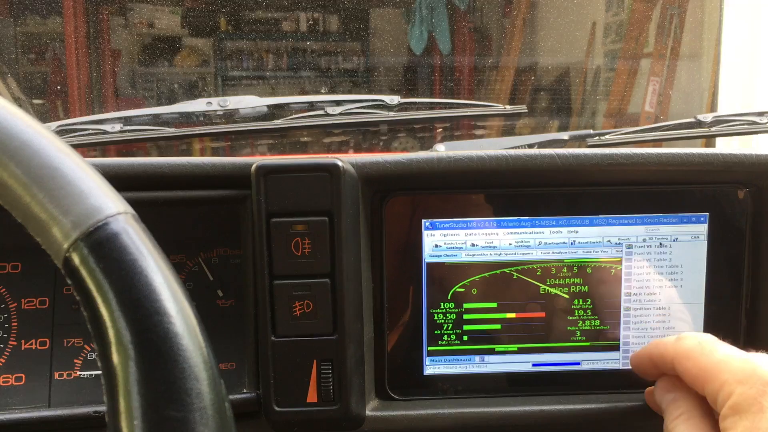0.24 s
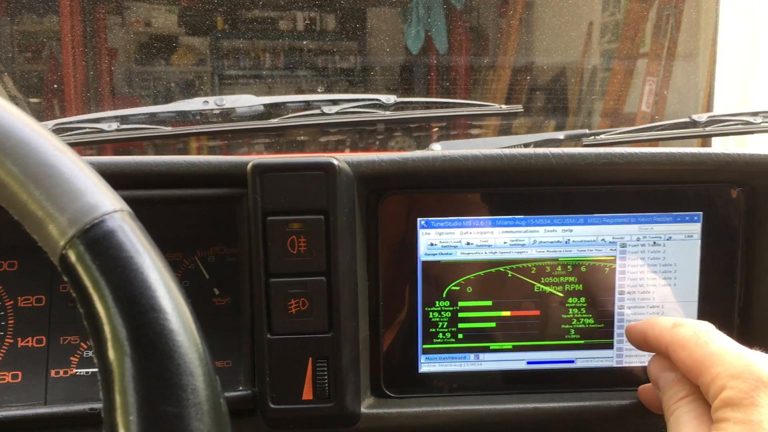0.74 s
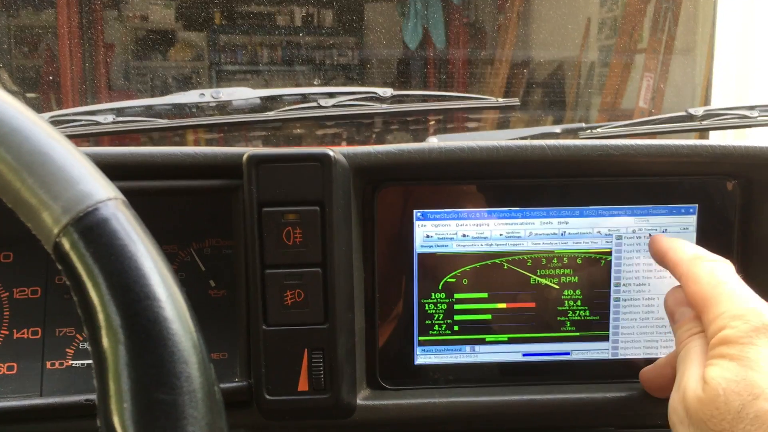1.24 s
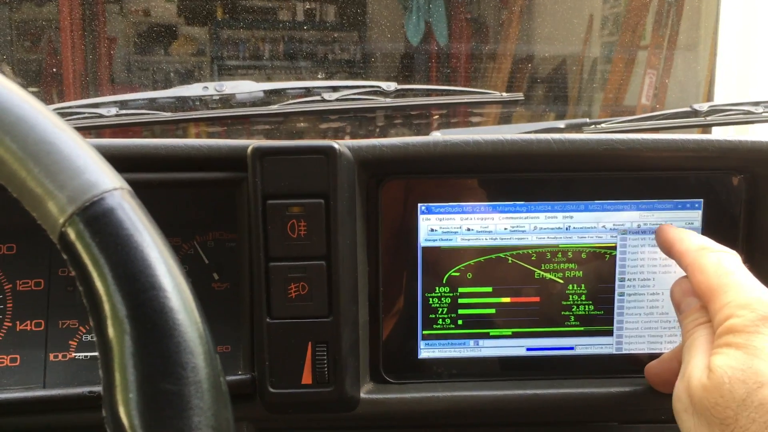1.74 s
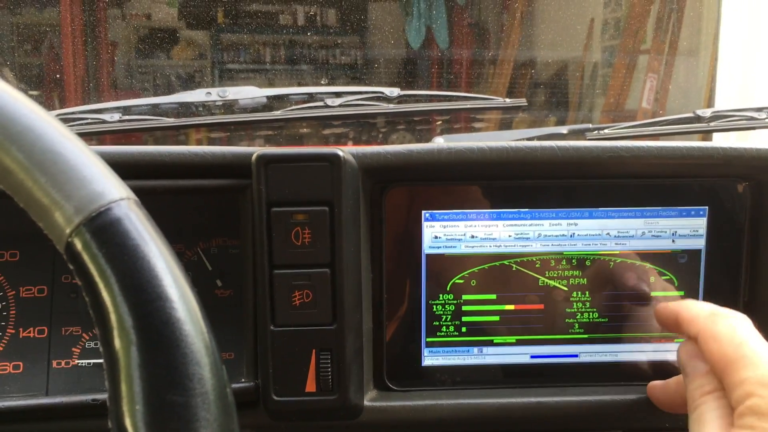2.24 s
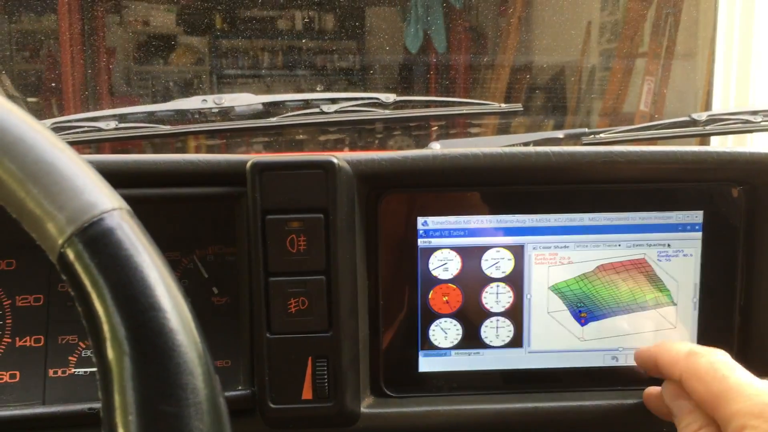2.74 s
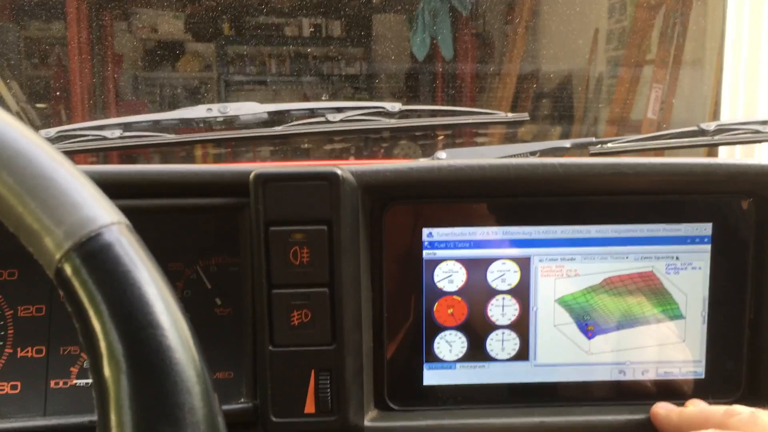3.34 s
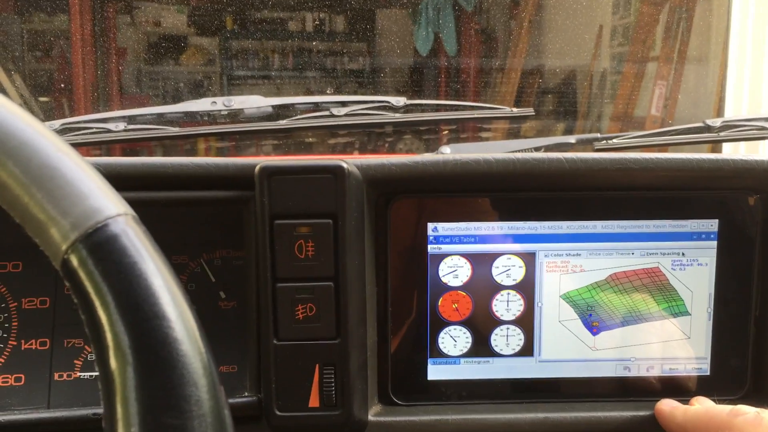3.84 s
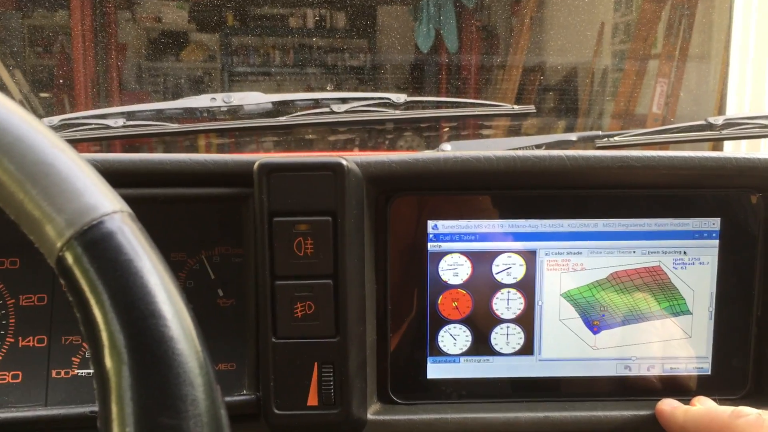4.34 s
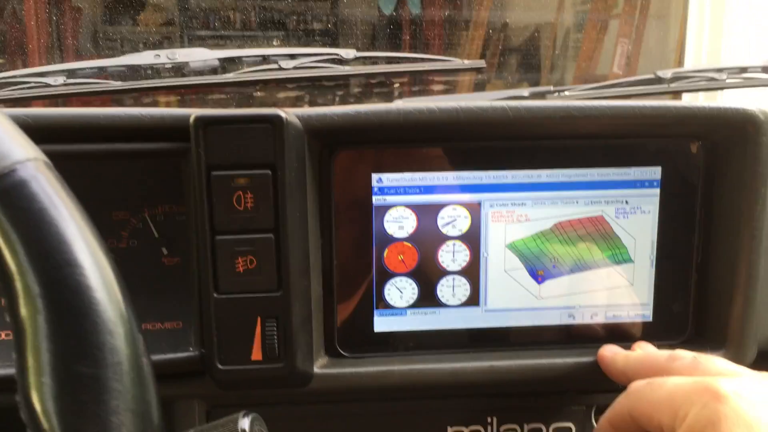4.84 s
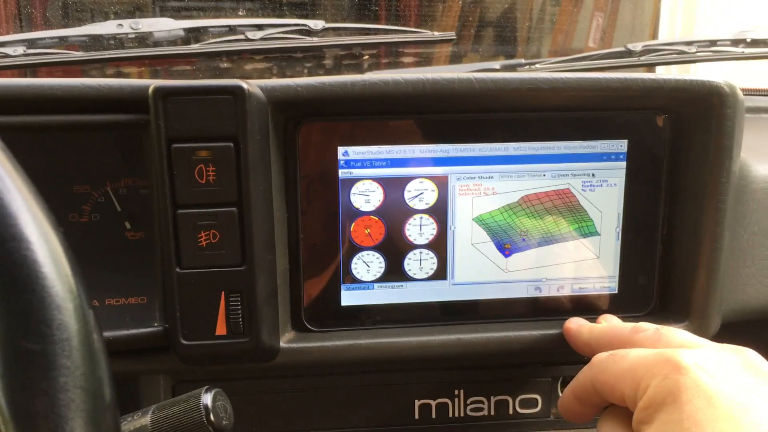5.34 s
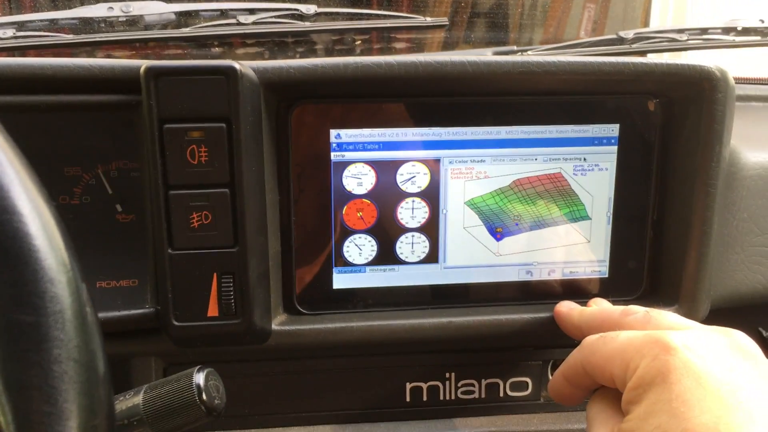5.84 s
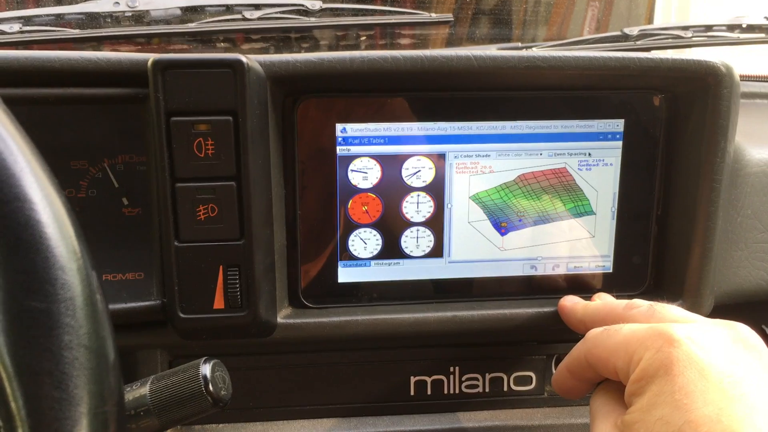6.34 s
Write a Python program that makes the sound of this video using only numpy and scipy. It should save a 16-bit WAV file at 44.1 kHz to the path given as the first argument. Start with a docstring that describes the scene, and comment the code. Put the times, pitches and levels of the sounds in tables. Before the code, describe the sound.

Heard from the driver's seat inside a stationary car, a six-cylinder petrol engine idles for the first 3.5 seconds. A heavy boom near 52 to 54 Hz fills the cabin, with slightly uneven exhaust throbs, low rumble, dull thuds, muffled valve clatter and tiny injector ticks. A thin, fluttering pulley whine sits around 1.4 kHz. At about 1.2 s a finger gives a small dry tap on the dashboard screen, with very faint skin swishes just before it and near 2.9 and 3.2 s. The idle sags slightly at 3.5 s, then the revs climb, fast until about 4.4 s and more gently to a peak near 5.6 s, at roughly twice idle speed. The growl smooths and rises, with bark and fan rush growing. From 5.8 s it sinks gradually, still well above idle at the 6.6 s end. Faint steady microphone hiss remains beneath.

```python
"""Driver's seat of a car, with a V6 petrol engine beyond the bulkhead: it idles, is slowly revved to
twice its speed and starts to sink back. The cabin booms near 54 Hz, driven by the firings at idle and
by the crankshaft at twice the speed. Exhaust orders, harmonics of the engine cycle, bark.
Noise and clicks timed by the crank make rumble, thuds, clatter and ticks; a pulley whines, the fan rush grows.
On the dashboard a finger brushes and taps a screen; faint microphone hiss lies beneath."""
import sys
import numpy as np
from scipy import signal
from scipy.fft import rfft, irfft, next_fast_len
from scipy.io import wavfile

SR = 44100
rng = np.random.default_rng(int(sys.argv[2]) if len(sys.argv) > 2 else 0)


def store_wav(level_fs):
    """Save 16-bit WAV to argv[1]."""
    pcm = np.round(np.clip(np.atleast_2d(level_fs), -1, 1) * 32767)
    wavfile.write(sys.argv[1], SR, pcm.T.astype(np.int16))


N = 290178
TIME = np.arange(N) / SR


def from_db(db):
    """Decibels to gain."""
    return 10 ** (np.asarray(db) / 20)


def rms_one(x):
    """Scale to unit rms."""
    return x / np.sqrt(np.mean(x ** 2) + 1e-20)


def at_hz(points, hz):
    """Read a spectrum in dB on a log-frequency axis."""
    f, db = np.transpose(points)
    return np.interp(np.log(hz + 1e-6), np.log(f), db)


def colour(x, spectrum, peaks=()):
    """Give x a broad spectrum with resonant peaks; rms 1."""
    size = next_fast_len(N + SR)
    hz = np.arange(size // 2 + 1) * SR / size
    db = at_hz(spectrum, hz)
    for peak_hz, width_hz, peak_db in peaks:
        db = db + peak_db / (1 + (2 * (hz - peak_hz) / width_hz) ** 2)
    return rms_one(irfft(rfft(x, size) * from_db(db), size)[:N])


def noise():
    """White noise for the full length."""
    return rng.standard_normal(N)


def drift(rate):
    """Smooth chance of spread 1, with about `rate` new values a second."""
    knots = rng.standard_normal(2000)
    return rms_one(np.interp(TIME * rate, np.arange(len(knots)), knots))


def butter(x, order, hz, kind="low"):
    """Smooth low-pass or high-pass."""
    return signal.sosfilt(signal.butter(order, hz, kind, fs=SR, output="sos"), x)


# Engine speed as it idles, revs and sinks back. Each row: time in seconds, firings per second.
SPEED = [(0.0, 51.8), (0.97, 52.29), (1.46, 51.16), (2.88, 52.79), (3.52, 50.35), (3.68, 52.8),
         (3.85, 62.25), (4.06, 72.04), (4.24, 86.59), (4.4, 93.97), (4.6, 99.72), (4.96, 106.19),
         (5.25, 109.4), (5.57, 112.4), (5.8, 111.74), (6.0, 108.4), (6.26, 103.99), (6.58, 97.6)]
IDLE_HZ, TOP_HZ = 52, 112   # firings per second


def engine_speed():
    """Firings per second at every sample, and revs on a log scale: 0 idling, 1 revved."""
    seconds, rate = np.transpose(SPEED)
    firings = np.interp(TIME, seconds, rate)
    return firings, np.log(firings / IDLE_HZ) / np.log(TOP_HZ / IDLE_HZ)


# Gaining speed at the first rate takes full load; losing it at the second is full overrun.
FULL_LOAD_HZ_PER_S, OVERRUN_HZ_PER_S, LOAD_LAG_S = 65, 12, 0.032


def speed_change(firings, full_hz_per_s):
    """How fast the engine gains speed (or loses it, for a negative rate), 0 to 1, felt with a lag."""
    share = np.clip(np.gradient(firings) * SR / full_hz_per_s, 0, 1)
    keep = np.exp(-1 / (LOAD_LAG_S * SR))
    return signal.lfilter([1 - keep], [1, -keep], share)


def resonate(x, hz, width_hz):
    """A driven mode: gain 1 and a quarter turn late at its own pitch."""
    r, w = np.exp(-np.pi * width_hz / SR), 2 * np.pi * hz / SR
    return signal.lfilter([0, (1 - r * r) * np.sin(w)], [1, -2 * r * np.cos(w), r * r], x)


# The two forces that shake the cabin. Each: level at idle in dB, rise when revved in dB,
# change under load in dB.
FIRING_FORCE = (-31.5, -0.96, 9.8)
CRANK_FORCE = (-43.5, 22.1, -9)
# Lowest air modes of the cabin around the seat. Each row: pitch in Hz, width in Hz, signed gain as a factor.
BOOM_MODES = [(53.25, 4.22, -11), (53.67, 8.15, 7.5), (66.6, 11.65, -3), (78.7, 2.8, 0.5)]


def boom(cycle, revs, load):
    """Six firings and three slower crank shakes per cycle drive the cabin, whose air modes swell and ring on."""
    fire_angle, crank_angle, waver_db = -.007, .074, .6   # angles in cycles
    run_in = cycle[0] + (cycle[1] - cycle[0]) * np.arange(-SR, 0)   # one second of idling beforehand
    angle = np.concatenate([run_in, cycle])

    def strength(force):
        """Gain of a force, held steady through the run-in."""
        idle_db, rise_db, load_db = force
        return np.pad(from_db(idle_db + rise_db * revs + load_db * load), (SR, 0), "edge")

    firing = strength(FIRING_FORCE) * np.cos(2 * np.pi * 6 * (angle - fire_angle))
    crank = strength(CRANK_FORCE) * np.cos(2 * np.pi * 3 * (angle - crank_angle))
    force = firing + crank
    modes = sum(gain * resonate(force, hz, width_hz) for hz, width_hz, gain in BOOM_MODES)
    return np.sqrt(2) * (force + modes)[SR:] * from_db(waver_db * drift(30))


# Orders that stand out, low throb first, then exhaust bark and growl, before the cabin colours them.
# Each row: multiple of the cycle rate, level at idle in dB, level revved in dB, change under load in dB.
STRONG_ORDERS = [(2,-65.5,-24,10.5), (4,-33.5,-31,-0.5), (5,-45.5,-46,12), (7,-65.5,-46,5.5),
                 (8,-50,-40,-6), (9,-41.5,-50,2), (10,-48,-53,2), (12,-37.5,-32,-1), (13,-45,-53,-5),
                 (14,-48,-48,-1.5), (15,-58,-55.5,-1.5), (16,-49.5,-49,-3.5), (18,-48.5,-39,4),
                 (19,-54.5,-55.5,1), (20,-50,-43,-7.5), (22,-57.5,-48,-7), (23,-70,-42,0.5),
                 (25,-65,-53.5,6), (26,-51.5,-54,-5), (27,-63,-58.5,-6.5), (30,-50,-54.5,1),
                 (34,-56,-57.5,-7), (35,-59.5,-60.5,-9.5), (36,-64,-59,-1.5), (39,-64,-55,-4),
                 (40,-51.5,-62,-7), (42,-66,-56.5,10.5), (48,-57.5,-50.5,-8.5), (51,-66,-61,0),
                 (54,-67.5,-59.5,-6), (55,-70,-61,-2), (60,-64.5,-66.5,4.5)]
# The other orders: level of an odd one, steps up for even ones and again for firing multiples.
ORDER_IDLE_DB, ORDER_REVVED_DB, EVEN_DB, FIRING_DB = -56, -59, 5, 17
# Above the knee those other orders fall away.
KNEE_ORDER, IDLE_FALL_DB_PER_OCTAVE, REVVED_FALL_DB_PER_OCTAVE = 9.14, 9.5, 7


def order_levels(k):
    """Level of order k at idle and revved, and its change under load, in dB."""
    for multiple, *levels_db in STRONG_ORDERS:
        if multiple == k:
            return levels_db
    family_db = EVEN_DB * (k % 2 == 0) + FIRING_DB * (k % 6 == 0)
    octaves = max(np.log2(k / KNEE_ORDER), 0)
    return (ORDER_IDLE_DB + family_db - IDLE_FALL_DB_PER_OCTAVE * octaves,
            ORDER_REVVED_DB + family_db - REVVED_FALL_DB_PER_OCTAVE * octaves, 0)


# How the cabin passes the engine orders to the seat. Each row: frequency in Hz, gain in dB.
CABIN = [(18.0, 2.2), (34.0, -4), (44.0, -4.5), (54.0, 10), (61.0, 11), (70.0, 10), (78.0, 4.2),
         (92.0, 0.5), (135.0, 8), (170.0, -3), (205.0, -5.5), (238.0, -10), (290.0, 2.2), (340.0, -6),
         (425.0, 0.6), (480.0, -11.5), (530.0, -0.5), (575.0, -9.5), (640.0, 2), (760.0, -15.5),
         (900.0, -7.3), (1020.0, -4), (1150.0, -1)]


def exhaust(cycle, revs, load, chuff_db):
    """The cylinders fire unevenly: harmonics of the whole cycle sweep through the cabin's resonances."""
    cycle_hz = np.gradient(cycle) * SR
    throb_angle, chuff_angle, second_angle = .63, .19, .57   # in cycles
    second_chuff_db, waver_db, wander_rad = -3, 1.5, .015
    out = np.zeros(N)
    for k in [2, 4, 5, *range(7, 62)]:
        idle_db, revved_db, load_db = order_levels(k)
        level_db = idle_db + (revved_db - idle_db) * revs + load_db * load
        level_db = level_db + at_hz(CABIN, k * cycle_hz)
        if k < 6:
            # one throb per cycle, lagging as these orders rise past the air modes
            lag = np.interp(k * cycle_hz, [45, 70], [0, .75])
            turns = k * (cycle - throb_angle) - lag
        elif k < 18:
            # a strong and a weak chuff per cycle, both dips in pressure
            strong = np.exp(-2j * np.pi * k * chuff_angle)
            weak = from_db(second_chuff_db) * np.exp(-2j * np.pi * k * second_angle)
            turns = k * cycle + np.angle(-(strong + weak)) / (2 * np.pi)
            level_db = level_db + chuff_db
        else:
            # the firing multiples bark in step, and the pipe scatters the rest
            turns = k * cycle + (k % 6 > 0) * (rng.random() + .1 * drift(3))
        # timing wanders most at idle, which blurs the high orders
        wander = wander_rad * k * (1 - .7 * revs) * drift(14)
        out += from_db(level_db + waver_db * drift(6.5)) * np.cos(2 * np.pi * turns + wander)
    return np.sqrt(2) * out


# Colour of the combustion rumble. Each row: frequency in Hz, level in dB per Hz.
RUMBLE = [(12, -20.5), (26, -2.5), (45, 2.5), (75, 5), (115, 0), (150, -0.5), (190, -14.5), (240, -17),
          (300, -17), (430, -21), (500, -42), (900, -48)]


def rumble(cycle, revs):
    """Uneven combustion rumbles between the low orders, in one lump per cycle, deepest at idle."""
    idle_db, rise_db = -36.5, 4
    lope_db = 3 * (1 - .6 * revs) * np.cos(2 * np.pi * (cycle - .35))
    return from_db(idle_db + rise_db * revs + lope_db) * butter(colour(noise(), RUMBLE), 4, 1000)


# Strength of the six cylinders in firing order. Each entry: level in dB.
CYLINDERS_DB = [-1.5, -2.5, 0, 0.5, -4, -1.5]
# Colour of a firing's thud. Each row: frequency in Hz, level in dB per Hz.
THUD = [(120, -14), (200, -4), (290, 1), (410, -2), (470, -13), (640, -12.5), (780, -19), (1500, -30),
        (4000, -60)]
# Resonances of the engine block. Each row: frequency in Hz, width in Hz, height in dB.
BLOCK = [(295, 40, 3), (420, 35, 4), (527, 45, 6), (625, 55, 4)]


def thuds(cycle, revs, level_db=-48.0, rise_db=3, fade_share=0.62, scatter_db=2):
    """Every firing thuds into the block as fading noise, with its cylinder's strength and some scatter."""
    firing, since = np.divmod(6 * cycle + .25, 1)   # count of firings, and share of the gap gone by
    firing = firing.astype(int)
    scatter = scatter_db * rng.standard_normal(firing.max() + 1)
    strength_db = np.take(CYLINDERS_DB, firing, mode="wrap") + scatter[firing]
    bursts = from_db(strength_db) * np.exp(-since / fade_share) * noise()
    return from_db(level_db + rise_db * revs) * colour(bursts, THUD, BLOCK)


def contacts(cycle, spread_db, scatter_db, jitter_s, count):
    """Clicks near the same crank angles in every cycle, each contact with its own strength."""
    angles = (np.arange(count) + rng.random(count)) / count
    strength = rng.choice([-1, 1], count) * from_db(spread_db * rng.standard_normal(count))
    when = np.interp(np.arange(100)[:, None] + angles, cycle, TIME, right=-1)   # up to 100 cycles
    at = ((when + jitter_s * rng.standard_normal(when.shape)) * SR).astype(int)
    sizes = strength * from_db(scatter_db * rng.standard_normal(when.shape))
    heard = (at > 0) & (at < N)
    return np.bincount(at[heard], sizes[heard], N)


def rattle_noise(clicks, fade):
    """Noise that bursts at each click and dies away with the fade."""
    power = np.abs(signal.fftconvolve(clicks ** 2, fade ** 2)[:N])
    return np.sqrt(power) * noise()


# Colour of the valve train from the seat. Each row: frequency in Hz, level in dB per Hz.
CLATTER = [(150, -41), (300, -7), (620, -2.5), (750, -1.5), (930, 1), (1200, -.5), (1570, -10), (1900, -7),
           (2700, -11), (3000, -17.5), (4200, -20), (7300, -28), (9000, -27.5), (10400, -33.5),
           (16000, -52)]
# Bulkhead and dashboard resonances, for valve train and fan. Each row: frequency in Hz, width in Hz, height in dB.
PANELS = [(527, 45, 6), (625, 60, 4), (900, 100, 4.5), (1405, 54, 7), (1890, 70, 4), (2400, 59, 3),
          (2580, 36, 3), (3150, 31, 5), (3560, 50, 4)]


def valve_train(cycle, revs, level_db=-51.5, rise_db=3, loose=1.3, rattle_hz=800):
    """Valves and cams knock on the block, which rings briefly; the top of every knock is a loose rattle."""
    clicks = contacts(cycle, spread_db=1.3, scatter_db=1.2, jitter_s=.00022, count=24)
    ring_s = .007
    fade = np.exp(-TIME[:SR // 10] / ring_s)
    block = signal.fftconvolve(clicks, fade * rng.standard_normal(len(fade)))[:N]
    block = butter(block, 2, 3500)
    rattle = butter(rattle_noise(clicks, fade), 2, rattle_hz, "high")
    knocks = rms_one(block) + loose * rms_one(rattle)
    return from_db(level_db + rise_db * revs) * colour(knocks, CLATTER, PANELS)


# Colour of the injector ticks. Each row: frequency in Hz, level in dB per Hz.
INJECTOR = [(2000, -16), (3300, -5), (4100, 1), (4600, -11), (5500, -3), (6050, -5), (6700, -4.5),
            (7500, -15), (8400, -6.5), (9600, -8.5), (10500, -14.5), (16000, -22.5)]


def injectors(cycle, revs, level_db=-71, rise_db=4, ring_s=0.017):
    """Six injectors snap in turn: short bright ticks of noise."""
    clicks = contacts(cycle, spread_db=1.5, scatter_db=1.6, jitter_s=.0003, count=6)
    fade = np.exp(-TIME[:SR // 20] / ring_s)
    return from_db(level_db + rise_db * revs) * colour(rattle_noise(clicks, fade), INJECTOR)


PULLEY_IDLE_HZ, PULLEY_REVVED_HZ = 1462, 1408


def pulley(cycle, revs, load, load_db=2, level_db=-63.0, rise_db=4, swing_db=6.0):
    """A pulley whines, swelling once per crank turn; louder under load and a little lower when revved."""
    fast, wander_hz = revs ** 4, 19
    hz = PULLEY_IDLE_HZ + (PULLEY_REVVED_HZ - PULLEY_IDLE_HZ) * fast + wander_hz * drift(90)
    ring = np.sqrt(2) * np.sin(2 * np.pi * np.cumsum(hz) / SR)
    rub = np.cos(4 * np.pi * (cycle - .22 - .3 * revs)) + .4 * drift(70)   # two crank turns per cycle
    return ring * from_db(level_db + rise_db * revs + load_db * load + swing_db * rub)


# Colour of fan and intake air. Each row: frequency in Hz, level in dB per Hz.
AIR = [(150, -10), (300, -6), (520, -1.5), (760, -4.5), (1000, -.5), (1300, 1), (2050, 3), (2700, -3),
       (3000, -8.5), (4200, -11), (5800, -20.5), (7500, -27.5), (9300, -24), (10500, -29.5), (15000, -51)]


def fan(cycle, revs, load, idle_db=-57.5, rise_db=10, load_db=1, throb_db=-1.5):
    """Air rushes through fan and intake, pulsing with the six intake strokes."""
    strokes = np.cos(2 * np.pi * 6 * cycle)
    rush_db = idle_db + rise_db * revs + load_db * load
    return from_db(rush_db + throb_db * strokes + 0.95 * drift(25)) * colour(noise(), AIR, PANELS)


# Finger sliding on the dashboard screen. Each row: centre in seconds, spread in seconds, peak level in dB.
BRUSHES = [(1.154, 0.039, -71), (2.917, 0.029, -69), (3.236, 0.029, -72)]
# Finger tapping the screen. Each row: start in seconds, level at the start in dB.
TAPS = [(1.22, -49)]
# Colours of the slide and the tap. Each row: frequency in Hz, level in dB per Hz.
SKIN = [(1000, -18.5), (5000, -3), (10000, 2), (12500, 4), (16000, -4)]
TAP = [(500, -7), (2500, 9), (7000, -10), (11500, -6), (16000, -13)]


def finger(tap_fade_s=0.0042):
    """Soft swishes of skin on the screen and a dry tap, all shaped noise."""
    slide, tap = np.zeros(N), np.zeros(N)
    for centre, spread, db in BRUSHES:
        slide += from_db(db) * np.exp(-.5 * ((TIME - centre) / spread) ** 2)
    for start, db in TAPS:
        tap += from_db(db) * (TIME >= start) * np.exp(-np.abs(TIME - start) / tap_fade_s)
    return slide * colour(noise(), SKIN) + tap * colour(noise(), TAP)


# Combustion and valve train: gain under full load, cut on full overrun.
WORK_LOAD_DB, WORK_OVERRUN_DB = 1.25, 1
# Exhaust chuffs: cut on full overrun, and gain for each firing per second the idle falls short.
CHUFF_OVERRUN_DB, LOPE_DB_PER_HZ = 2, 1.1


def scene():
    """The crank angle drives every part of the engine; speed and load set how hard each one works."""
    firings, revs = engine_speed()
    load = speed_change(firings, FULL_LOAD_HZ_PER_S)
    overrun = speed_change(firings, -OVERRUN_HZ_PER_S)
    cycle = np.cumsum(firings) / SR / 6   # four-stroke cycles turned, six firings in each
    work = from_db(WORK_LOAD_DB * load - WORK_OVERRUN_DB * overrun)
    # the slower it idles, the harder it chuffs
    sag_db = LOPE_DB_PER_HZ * np.maximum(IDLE_HZ - firings, -1) * (1 - revs)
    low = boom(cycle, revs, load) + exhaust(cycle, revs, load, sag_db - CHUFF_OVERRUN_DB * overrun)
    low = low + work * (rumble(cycle, revs) + thuds(cycle, revs))
    bay = work * valve_train(cycle, revs) + injectors(cycle, revs)
    bay = bay + pulley(cycle, revs, load) + fan(cycle, revs, load)
    behind_bulkhead = butter(bay, 2, 14000)
    return (low + behind_bulkhead + finger())[None]


# Colour of the microphone hiss. Each row: frequency in Hz, level in dB per Hz.
HISS = [(1000, 0), (9500, 0), (10400, -3), (11300, 0), (13000, -1), (15000, -3)]


def record(dry):
    """The microphone adds faint steady hiss, and the top is cut steeply above 15750 Hz."""
    hiss = from_db(-72.5) * colour(noise(), HISS)
    top = signal.ellip(14, .1, 70, 15750, fs=SR, output="sos")
    return signal.sosfilt(top, dry + hiss)


dry = scene()
out = record(dry)
store_wav(out)
```